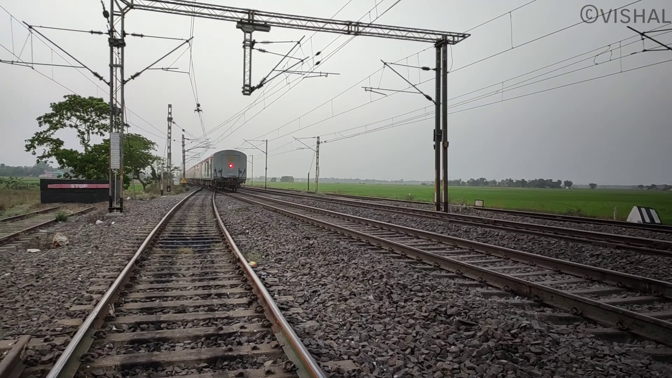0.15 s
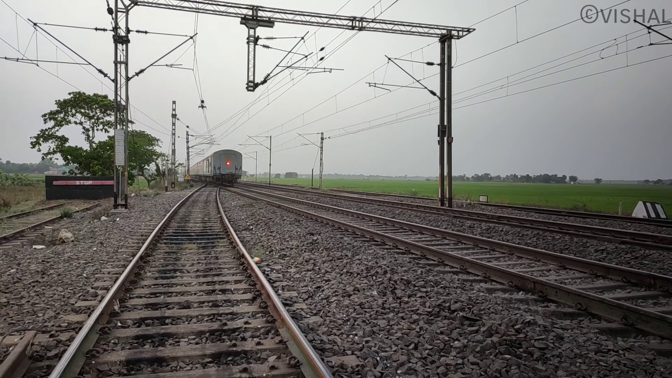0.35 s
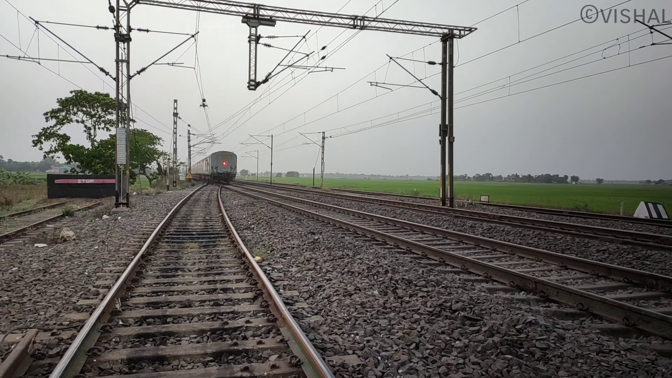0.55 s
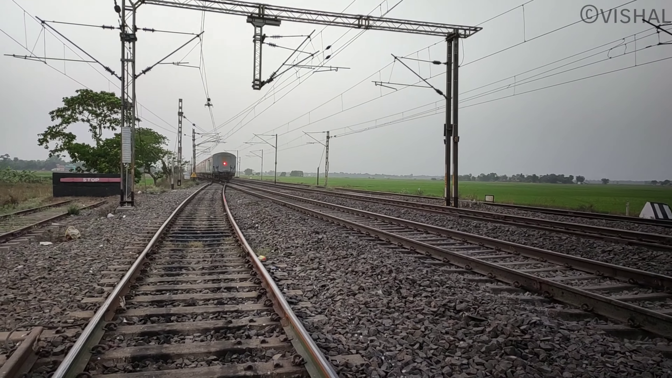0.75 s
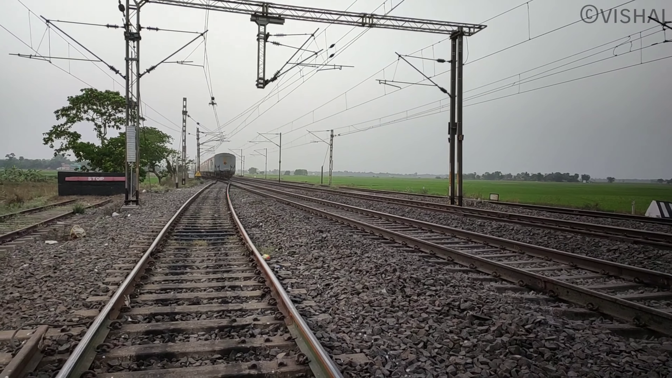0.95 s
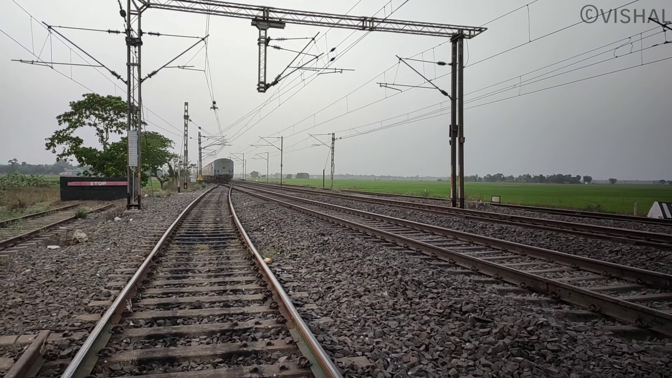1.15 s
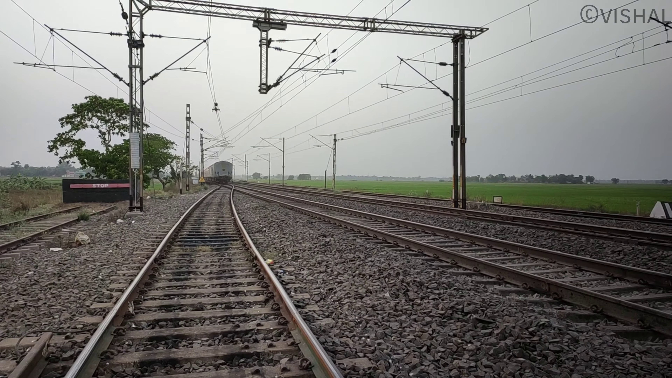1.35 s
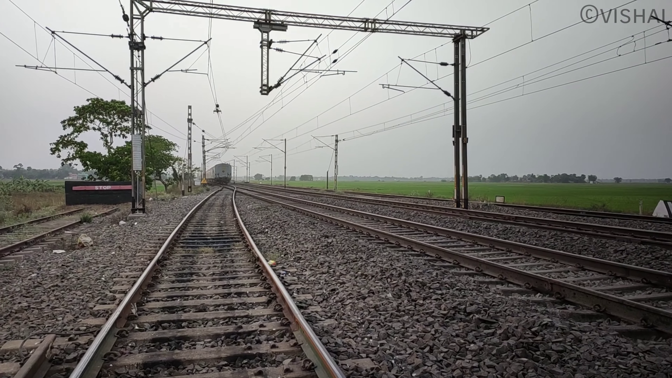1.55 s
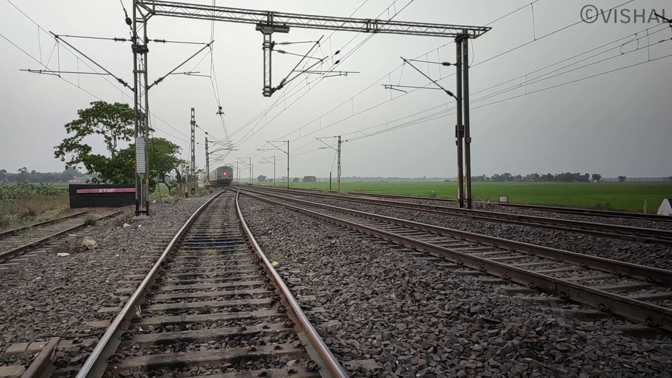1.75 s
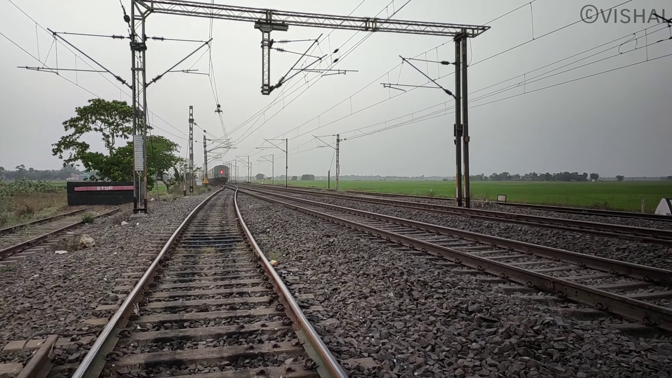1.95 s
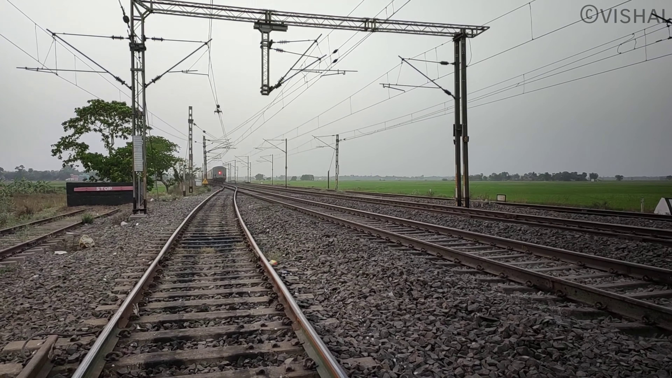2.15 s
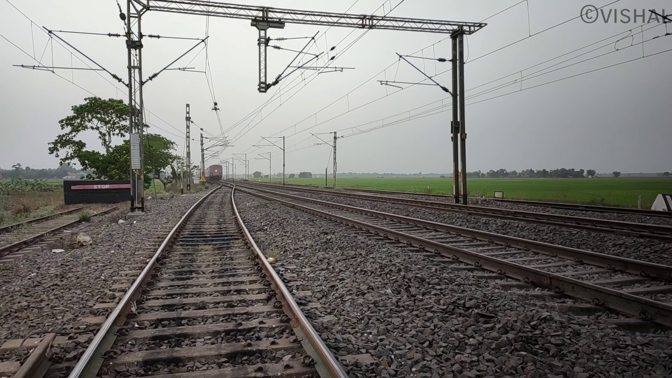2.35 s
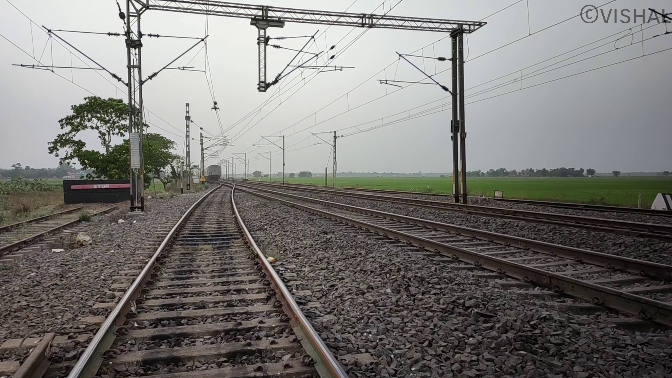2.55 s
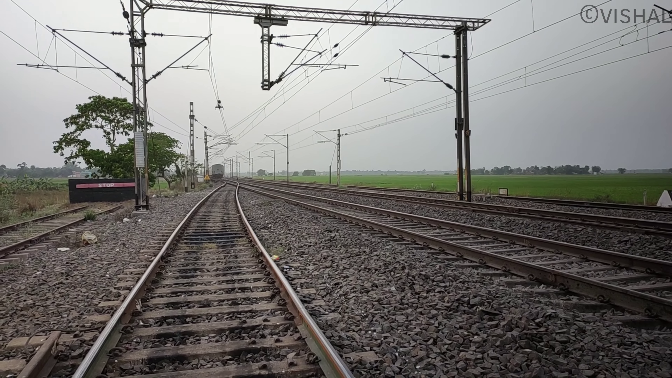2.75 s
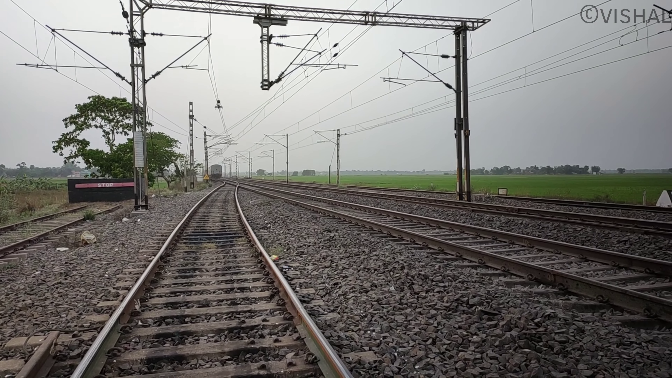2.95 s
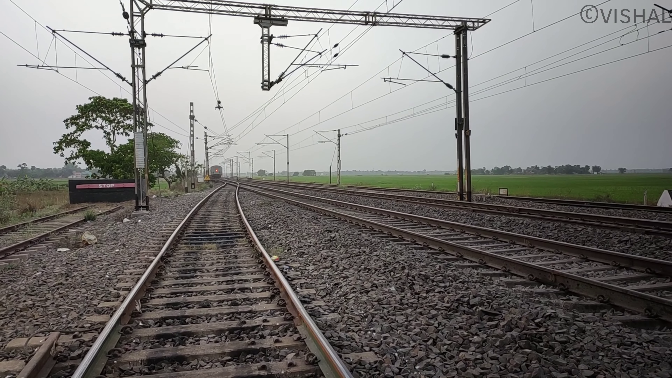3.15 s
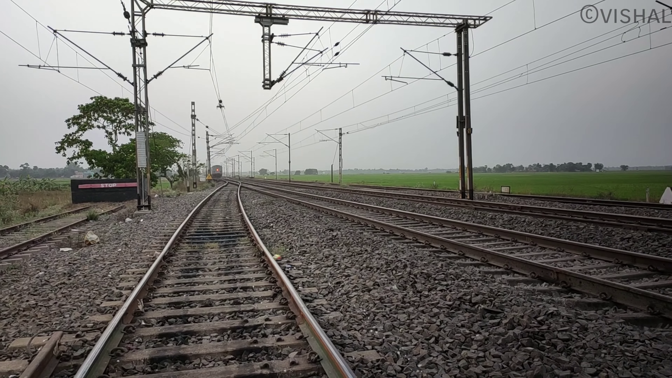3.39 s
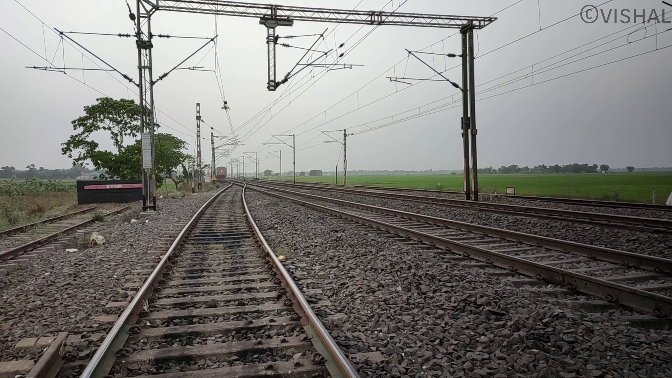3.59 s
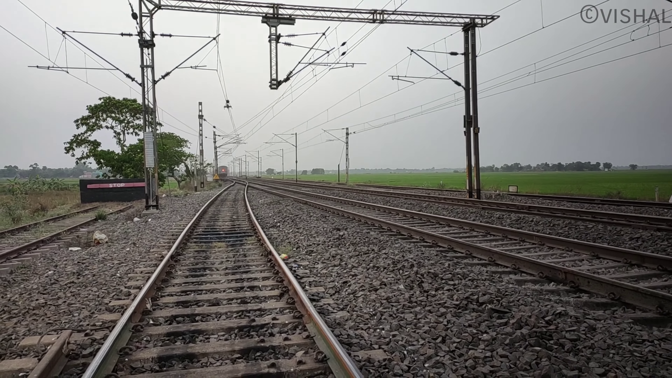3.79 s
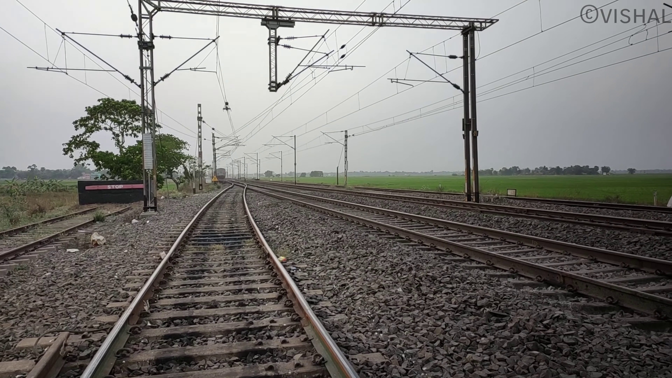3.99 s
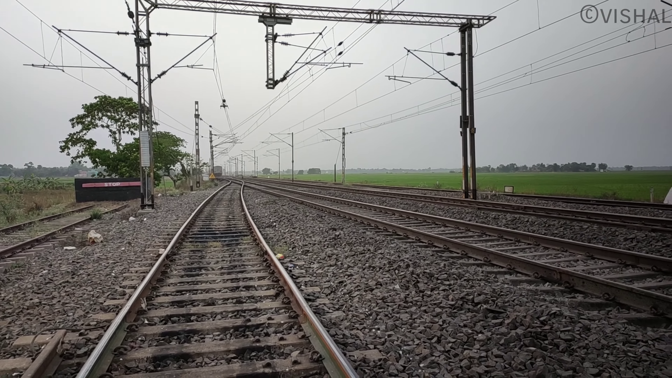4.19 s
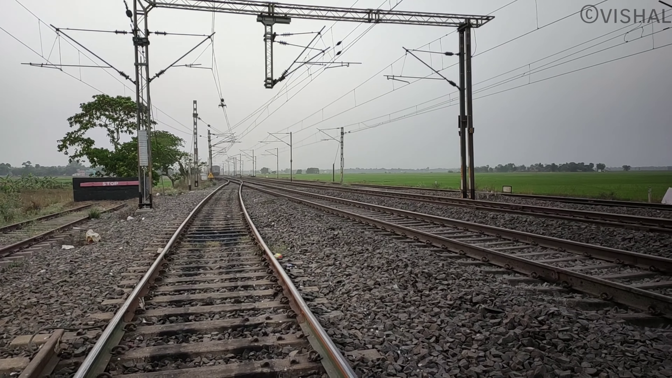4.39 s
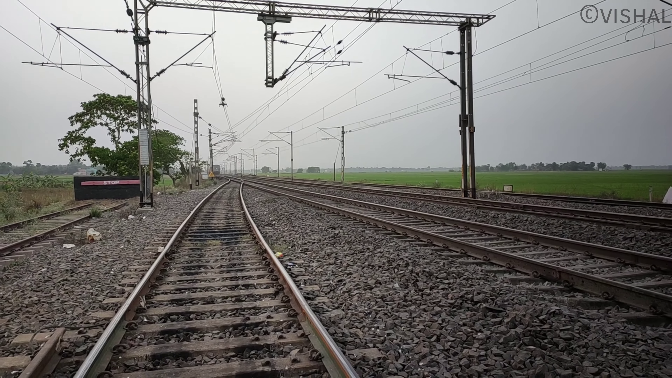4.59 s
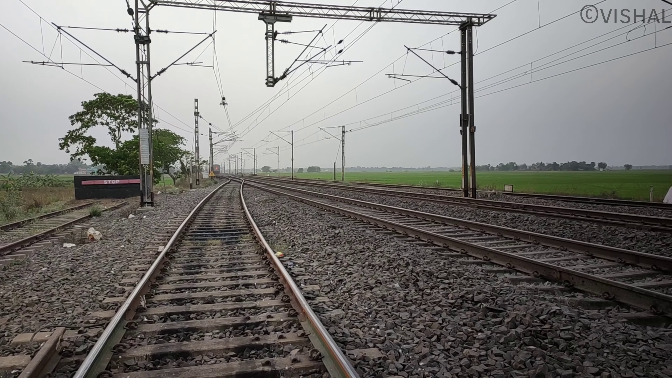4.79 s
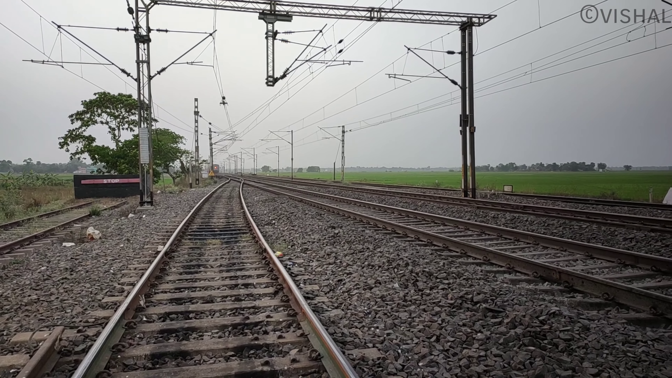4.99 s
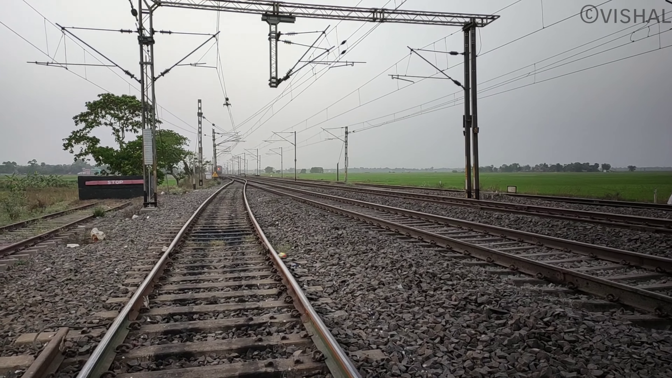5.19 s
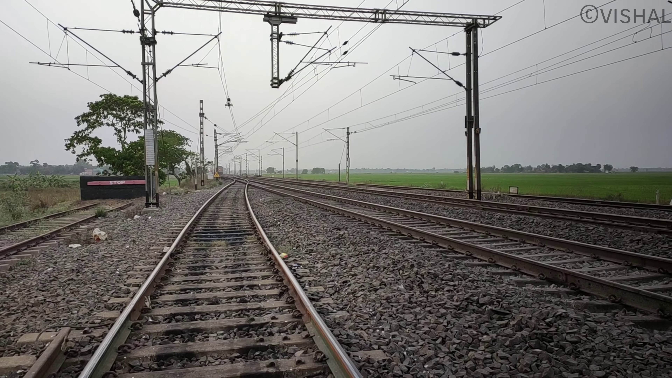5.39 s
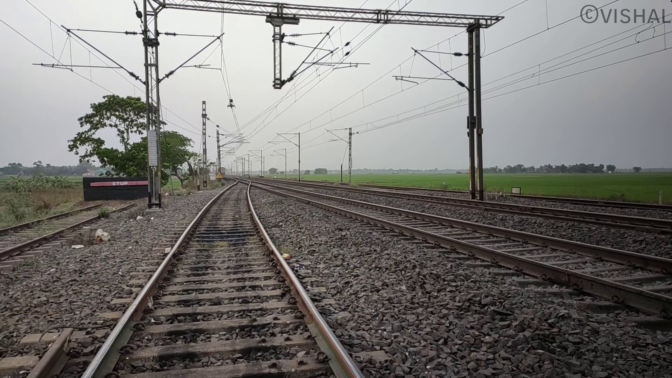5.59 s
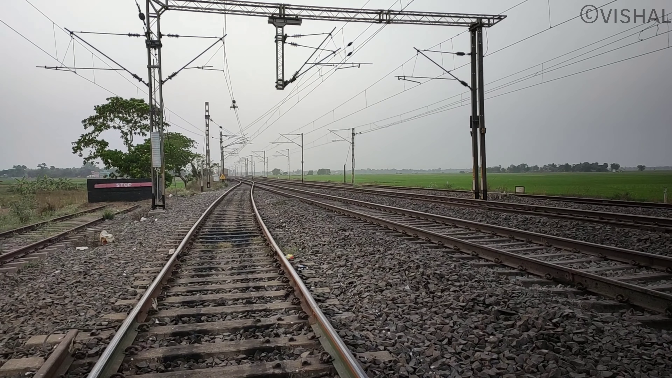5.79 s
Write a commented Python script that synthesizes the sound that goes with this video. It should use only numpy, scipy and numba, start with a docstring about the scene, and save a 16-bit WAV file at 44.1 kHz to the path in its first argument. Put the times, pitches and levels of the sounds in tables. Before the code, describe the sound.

Trackside in open fields, the tail of a fast train has just passed. A dense wheel roar with bright hiss drops away within the first second as hard slipstream gusts thump, crackle and overload the unprotected stereo microphone, strongest on the right. After about two seconds the wind breaks into separate low puffs, and a thinner, duller rolling rush with faint steely ringing recedes, slightly uneven, to the end.

```python
"""An express train has just rushed past on the next track and runs off across open fields.
Its wheels roar and the rails ring: shaped noise that spreads and loses treble with distance.
The last coach adds a fading roar and hiss, and now and then a wheel swishes on the rail.
The slipstream buffets two microphone ports as turbulent pressure noise, with gusts and
sharp eddies, at first so hard that they overload."""
import sys
import numpy as np
from scipy import signal
from scipy.fft import rfft, irfft
from scipy.io import wavfile
from scipy.ndimage import uniform_filter1d
from numba import njit

SR = 44100
rng = np.random.default_rng(int(sys.argv[2]) if len(sys.argv) > 2 else 0)


def unload_audio(sound):
    """Save the sound as a 16-bit wav file, at the path given as the first command line argument."""
    columns = np.transpose(np.atleast_2d(sound))
    # keep every value between -1 and 1, then stretch to whole-number steps
    steps = np.round(np.clip(columns, -1, 1) * 32767)
    wavfile.write(sys.argv[1], SR, steps.astype(np.int16))


N = 257544
TIME = np.arange(N) / SR
FRAME = 2048   # samples per short-time spectrum


def from_db(db):
    """Decibel law: 20 dB is a tenfold amplitude gain."""
    return 10 ** (np.asarray(db) / 20)


def rms_one(x):
    """Power normalisation: scale to unit mean square."""
    return x / np.sqrt(np.mean(x ** 2) + 1e-20)


def in_time(rows, at):
    """Linear interpolation: the columns of a curve table at the given times."""
    s, *columns = np.transpose(rows)
    return [np.interp(at, s, column) for column in columns]


def at_hz(points, hz):
    """Logarithmic pitch scale: a spectrum table interpolated along log frequency."""
    f, value = np.transpose(points)
    return np.interp(np.log(hz + 1), np.log(f), value)


def drift(rate_hz):
    """Low-passed noise: smooth chance of spread 1, changing about rate_hz times a second."""
    hz = np.fft.rfftfreq(N, 1 / SR)
    spectrum = rfft(rng.standard_normal(N)) / (1 + (hz / rate_hz) ** 2)
    return rms_one(irfft(spectrum, N))


def butter(x, hz, kind, order=2):
    """Butterworth filtering: a maximally flat passband."""
    return signal.sosfilt(signal.butter(order, hz, kind, fs=SR, output="sos"), x)


def swell(s, length, at):
    """Gaussian envelope: height 1 at time s, falling to 1/e one length away."""
    return np.exp(-((at - s) / length) ** 2)


def around(s):
    """Local time window: sample numbers of the 0.4 s around a moment, held at the ends."""
    return np.clip(round(s * SR) + np.arange(-SR // 5, SR // 5), 0, N - 1)


def noise_frames(channels):
    """Short-time Fourier analysis of white noise: frequencies, times, frames."""
    return signal.stft(rng.standard_normal((channels, N)), SR, nperseg=FRAME)


def peaks_db(rows, hz):
    """Resonance curves: the summed lift in dB of rows (frequency, width, peak dB)."""
    return sum(db / (1 + (2 * (hz - f) / width) ** 2) for f, width, db in rows)


def port_turn(hz, turn_hz, half_width_hz, radians):
    """Phase dispersion: the lag between the ports makes a smooth step around one frequency."""
    return radians * (.5 + np.arctan((hz - turn_hz) / half_width_hz) / np.pi)


def strands(shape):
    """Random excitation: narrow bands swell and fade as the wheels meet fresh rail; spread 1."""
    over_hz = uniform_filter1d(rng.standard_normal(shape), size=2, axis=0)
    return rms_one(uniform_filter1d(over_hz, size=8, axis=1))


# directivity of the ports, which face different ways: (frequency [Hz], left minus right [dB])
PORT_BALANCE = [(200, -0.5), (450, 0), (630, -5), (800, 5), (1150, 8), (1400, 4.5), (1850, 4), (2120, 10),
                (2500, -2.5), (2800, -3), (3350, 2), (4700, -4.5), (5300, 3), (7200, -3), (11000, 0.5)]
# air resonances in the right port: (frequency [Hz], width [Hz], peak lift [dB])
RIGHT_PORT_RESONANCES = [(2450, 700, 5.5), (4144, 380, 8), (7270, 1000, 2.5)]


def port_colour_db(hz):
    """Directivity and cavity resonance: the (left, right) colour in dB of each port."""
    half = at_hz(PORT_BALANCE, hz) / 2
    return np.array([half, peaks_db(RIGHT_PORT_RESONANCES, hz) - half])


def at_ports(frames, hz):
    """Inverse Fourier synthesis: frames back to sound, coloured by each port."""
    coloured = frames * from_db(port_colour_db(hz))[:, :, None]
    return signal.istft(coloured, SR)[1][:, :N]


START_M, SPEED_M_S = 11.1, 35.7


def distance_m(at):
    """Uniform motion: the train draws away at a steady speed."""
    return START_M + SPEED_M_S * at


# a long line of sources spreads slowly: level at the start, loss per doubling of distance
ROLLING_DB, SPREAD_DB = -21, 3.5
# the last coach's hiss fades fast; a faint hiss stays at a level relative to the rolling
NEAR_HISS_DB, HISS_FADE_DB_PER_S, FAR_HISS_DB = -29, 9.5, -22
# rougher and smoother stretches of rail:
# (time [s], 1/e half length [s], rolling lift [dB], hiss lift [dB])
RAIL_ROUGHNESS = [(0.435, .04, -2, 1), (1.694, 0.022, 1.5, 6), (2.007, 0.15, 2, 4.5), (2.465, 0.091, 2, 6),
                  (2.784, 0.13, 2, 8), (3.152, 0.14, 4, 9.5), (3.648, 0.35, 4, 4), (4.226, 0.13, 6.5, 4.5),
                  (4.58, 0.14, 4, 3.5), (4.843, 0.024, -2, -1), (4.948, 0.051, 4, 4), (5.023, 0.037, 3, 3),
                  (5.213, 0.11, 2, 4), (5.31, 0.067, -2, 0), (5.392, 0.025, 3, 2), (5.45, 0.025, 6, 2),
                  (5.534, 0.017, -6, 5), (5.66, 0.05, 3, 0)]


def train_levels(at):
    """Geometric spreading: rolling and hiss in dB sink with distance and vary with the rail."""
    rolling_db = ROLLING_DB - SPREAD_DB * np.log2(distance_m(at) / START_M)
    near_hiss = from_db(NEAR_HISS_DB - HISS_FADE_DB_PER_S * at)
    far_hiss = from_db(rolling_db + FAR_HISS_DB)
    hiss_db = 20 * np.log10(np.hypot(near_hiss, far_hiss))
    for s, length, rolling_lift_db, hiss_lift_db in RAIL_ROUGHNESS:
        shape = swell(s, length, at)
        rolling_db = rolling_db + rolling_lift_db * shape
        hiss_db = hiss_db + hiss_lift_db * shape
    return rolling_db, hiss_db


RING_WANDER, RING_SWING_DB = 0.015, 2.2   # spread of pitch (as a share of it) and of strength
# ringing of wheels and rails: (frequency [Hz], width [Hz], peak lift [dB])
RINGING_MODES = [(893, 290, 5.5), (1370, 21, 4.5), (1653, 56, 8), (1906, 68, 6.5), (2124, 42, 2),
                 (2490, 12, -2), (3140, 36, 2), (3410, 160, 3.5)]


def ringing_db(hz, count):
    """Modal resonance: ringing bands waver in pitch and strength; dB by frequency and frame."""
    chance = rng.standard_normal((len(RINGING_MODES), 2, count))
    waver = rms_one(uniform_filter1d(uniform_filter1d(chance, size=7), size=5))
    modes = []
    for (f, width, db), (bend, swing) in zip(RINGING_MODES, waver):
        modes.append((f * (1 + RING_WANDER * bend), width, db + RING_SWING_DB * swing))
    return peaks_db(modes, hz[:, None])


AIR_DB_PER_M = 0.0122   # loss at 4 kHz
LEFT_LAG_S = .00007
GROUND_DIP = (310, 340, -2)   # (frequency [Hz], width [Hz], lift [dB] at GROUND_FAR_M)
GROUND_FAR_M = 187
# wheels on rails: (frequency [Hz], relative density [dB per Hz])
ROLLING_SPECTRUM = [(30, 7.5), (120, -2), (220, -4.5), (400, 4), (540, 1), (690, -8.5), (1000, -6.5),
                    (1250, -15), (1750, -5.5), (2350, -8), (3100, -13.5), (4500, -21.5), (5400, -36),
                    (15000, -52)]
# coherence of the rolling sound: (frequency [Hz], share of power common to both ports [0 to 1])
COMMON_SHARE = [(100, 1), (450, 0.97), (900, 0.62), (2000, 0.89), (4200, 0.45), (9000, 0.086)]


def rolling(rattle_db=0.92, rattle_hz=22):
    """Roughness excitation and air absorption: rough wheels drive the steel, air takes the treble."""
    hz, s, white = noise_frames(channels=3)
    spectrum_db = at_hz(ROLLING_SPECTRUM, hz)[:, None] + ringing_db(hz, count=len(s))
    colour = rms_one(from_db(spectrum_db))
    # the ground swallows the low mids with distance
    ground_db = peaks_db([GROUND_DIP], hz)[:, None] * (distance_m(s) / GROUND_FAR_M) ** 2
    air_db = -AIR_DB_PER_M * (hz[:, None] / 4000) ** 1.66 * distance_m(s)
    common = at_hz(COMMON_SHARE, hz)[:, None]
    frames = np.sqrt(common) * white[2] + np.sqrt(1 - common) * white[:2]
    # around the air resonance the two ports turn out of phase
    turn = port_turn(hz, turn_hz=2586, half_width_hz=190, radians=-5.5)
    frames[0] *= np.exp(-1j * (2 * np.pi * hz * LEFT_LAG_S + turn))[:, None]
    strands_db = 2.5 * strands(white[0].shape)
    frames = frames * colour * from_db(air_db + ground_db + strands_db)
    rolling_db, _ = train_levels(TIME)
    return from_db(rolling_db + rattle_db * drift(rattle_hz)) * at_ports(frames, hz)


ROAR_HOLD_S = 0.59   # the roar holds while the last bogie is near
ROAR_PAN_DB, ROAR_COMMON = -6, 0.87   # left minus right; share of power common to both ports
# churned air and bogies: (frequency [Hz], relative density [dB per Hz])
BOGIE_ROAR = [(60, 7.5), (230, 4), (450, 2.5), (600, 11.5), (700, -1.5), (870, 4), (1000, 1), (1220, 3),
              (1420, -34), (2250, -9.5), (2900, -21), (4000, -36), (9000, -45)]
# hiss of steel and dust: (frequency [Hz], relative density [dB per Hz])
STEEL_HISS = [(1500, -4.5), (3500, 2), (5500, -1), (7500, -1.5), (11000, 1), (13000, -2.5), (15000, -12.5)]


def last_coach(roar_db=-19.0, fade_db_per_s=35, flicker_db=1.5,
               near_top_hz=20000, far_top_hz=6300, dulling_s=0.49):
    """Broadband noise radiation: the bogie roar holds and drops away; the hiss sinks and dulls."""
    hz, s, white = noise_frames(channels=5)
    roar = np.sqrt(ROAR_COMMON) * white[4] + np.sqrt(1 - ROAR_COMMON) * white[:2]
    # the upper roar reaches the ports out of phase
    turn = port_turn(hz, turn_hz=577, half_width_hz=49, radians=-3.5)
    roar[0] *= np.exp(-1j * turn)[:, None]
    roar *= from_db([ROAR_PAN_DB / 2, -ROAR_PAN_DB / 2])[:, None, None]
    roar *= rms_one(from_db(at_hz(BOGIE_ROAR, hz)))[:, None]
    strands_db = 3.5 * strands(white[0].shape)
    roar *= from_db(roar_db + strands_db - fade_db_per_s * np.maximum(s - ROAR_HOLD_S, 0))

    _, hiss_db = train_levels(s)
    top_hz = far_top_hz + (near_top_hz - far_top_hz) * np.exp(-s / dulling_s)
    dull = 1 / np.sqrt(1 + (hz[:, None] / top_hz) ** 10)
    hiss_colour = rms_one(from_db(at_hz(STEEL_HISS, hz)))[:, None]
    hiss = white[2:4] * hiss_colour * from_db(hiss_db) * dull
    return at_ports(roar + hiss, hz) * from_db(flicker_db * drift(15))


@njit
def glide_lowpass(x, pole):
    """Cascaded first-order smoothing: three one-pole low-passes with a moving corner."""
    out = np.empty_like(x)
    a = b = c = 0.
    for i in range(len(x)):
        a += (1 - pole[i]) * (x[i] - a)
        b += (1 - pole[i]) * (a - b)
        c += (1 - pole[i]) * (b - c)
        out[i] = c
    return out


def turbulence(eddy_hz):
    """Eddy spectrum: pressure noise of about unit power, falling steeply above the eddy rate."""
    eddy_hz = np.clip(eddy_hz, 40, 9000)
    power = 3 * np.pi / 8 * eddy_hz / SR   # what the low-passes let through
    pole = np.exp(-2 * np.pi * eddy_hz / SR)
    return glide_lowpass(rng.standard_normal(len(eddy_hz)), pole) / np.sqrt(power)


# flutter grows faster than its wind: level at 0 dB of wind, and dB per dB, for (left, right)
FLUTTER_DB, FLUTTER_GROWTH = (-8, -2), (1.54, 1.158)
LEE_FLUTTER_DB = -10.5   # the port on the far side of a gust flutters less
# small eddies die out first, so past its peak the wake coarsens; eddy rates for (left, right)
FRESH_EDDY_HZ, SPENT_EDDY_HZ = (344, 1200), (295, 343)
WAKE_PEAK_S, WAKE_LIFE_S = 0.65, 0.47
# the slipstream arrives, blows hard and ebbs to a breeze:
# (time [s], wind at the left port [dB], wind at the right port [dB])
SLIPSTREAM_WIND = [(0, -17.5, -32), (.33, -14.5, -13.5), (.44, -12.5, -9), (.98, -5.5, -1.5),
                   (1.2, -9.5, -8.5), (1.39, -8.5, -16), (1.7, -12, -10), (2.1, -11.5, -11),
                   (2.2, -14, -29.5), (2.42, -21, -21), (2.8, -12, -31), (3.02, -23.5, -36),
                   (3.4, -29, -26), (3.68, -18.5, -44), (4.1, -22.5, -19), (5.05, -22, -27.5),
                   (5.4, -26.5, -43), (5.52, -34, -38), (5.84, -28, -34)]
# gusts shed by the train: (time [s], 1/e half length [s], left push [dB], right push [dB],
# flutter relative to the push [dB])
SHED_GUSTS = [(0.022, 0.099, -3, -35, -19.5), (0.164, 0.028, -46, -16.5, 3), (0.443, 0.03, -12, 3, -9),
              (0.603, 0.21, -1, -11, -34), (0.783, 0.12, 1.5, 3.5, -5), (1.064, 0.087, -13, 3, -27),
              (1.29, 0.045, -16, -10, 2), (1.58, 0.031, -16, -28, -27), (1.795, 0.064, -12.5, -13, -4),
              (2.05, 0.02, -9, -8, -15), (2.201, 0.026, -2, -41, -13), (2.331, 0.043, -31, -17.5, 3),
              (2.507, 0.061, -14, -13, -9), (2.616, 0.029, -8, -41, -19.5), (2.712, 0.032, -16, -15, 1.5),
              (2.8, 0.067, -9.5, -20, -12.5), (3.15, 0.069, -13.5, -29, -9.5),
              (3.335, 0.06, -52, -19.5, -16), (3.74, 0.033, -11.5, -40, -12.5), (3.855, 0.015, 2, -10, -22),
              (3.921, 0.11, -14, -12, -1.5), (4.035, 0.012, -8, 1.5, -14), (4.073, 0.0097, -7, -10.5, -28),
              (4.213, 0.044, -44, -12.5, -5.5), (4.4, 0.066, -21.5, -21, 0), (4.477, 0.039, -23, -6, -22),
              (4.667, 0.08, -37, -26.5, 0.5), (4.793, 0.055, -14, -8, -22), (4.912, 0.047, -37, -17, -6.5),
              (5.125, 0.013, -20.5, -19, -13), (5.752, 0.18, -44, -20, -30)]


def airflow(port):
    """Power addition of gusts and slipstream: buffeting dB, flutter dB and eddy rate at a port."""
    side = ["left", "right"].index(port)
    flow_db = in_time(SLIPSTREAM_WIND, TIME)[side]
    push = from_db(flow_db)
    flutter = from_db(FLUTTER_DB[side] + FLUTTER_GROWTH[side] * flow_db)
    for s, length, left_db, right_db, flutter_db in SHED_GUSTS:
        gust_db = (left_db, right_db)[side]
        gust = from_db(gust_db) * swell(s, length, TIME)
        lee_db = LEE_FLUTTER_DB if gust_db < max(left_db, right_db) else 0
        push = np.hypot(push, gust)
        flutter = np.hypot(flutter, gust * from_db(flutter_db + lee_db))
    freshness = 1 / (1 + ((TIME - WAKE_PEAK_S) / WAKE_LIFE_S) ** 2)
    eddy_hz = SPENT_EDDY_HZ[side] + (FRESH_EDDY_HZ[side] - SPENT_EDDY_HZ[side]) * freshness
    return 20 * np.log10(push), 20 * np.log10(flutter), eddy_hz


def wind(port, knee_hz, top_hz, lowest_hz, flutter_low_hz, lumpy_db, lump_hz, quicken,
         grain_db=1.33, grain_hz=260):
    """Turbulent pressure: big eddies push slowly, small ones flutter; both brighten with strength."""
    buffet_db, flutter_db, eddy_hz = airflow(port)
    # top_hz is the eddy rate at 0 dB of buffeting
    buffet = turbulence(top_hz * from_db(quicken * buffet_db))
    buffet = butter(butter(buffet, knee_hz, "low", order=1), lowest_hz, "high")
    # the airflow alone sets the strength
    buffet /= np.sqrt(uniform_filter1d(buffet ** 2, size=SR // 10) + 1e-9)
    # each burst breaks up into finer grains
    lumps_db = lumpy_db * np.clip(drift(lump_hz), -2, 2)
    grains_db = grain_db * np.clip(drift(grain_hz), -2, 2)
    burst_db = lumps_db + grains_db
    flutter = turbulence(eddy_hz * from_db(quicken * burst_db))
    flutter = butter(flutter, flutter_low_hz, "high", order=1) * from_db(burst_db)
    # bursts share out the flutter's power
    flutter /= np.sqrt(uniform_filter1d(flutter ** 2, size=SR // 12) + 1e-9)
    return from_db(buffet_db) * buffet + from_db(flutter_db) * flutter


# small sharp eddies that strike the ports, levels before the ports dull them:
# (time [s], left level [dB], right level [dB], length [s], eddy rate [Hz])
SHARP_EDDIES = [(0.023, -16, -36, 0.008, 507), (.389, -20, -12, .004, 1000), (0.414, -14, -3, 0.02, 1400),
                (0.439, -21, -6.5, 0.01, 2000), (0.461, -28, -8, 0.0044, 2300),
                (0.492, -21, -4, 0.015, 990), (0.536, -29, -1, 0.019, 1490), (0.605, -34, -1, .001, 3800),
                (0.608, -36, -0.5, 0.0081, 2300), (0.626, -34, -9, 0.0088, 1900),
                (0.678, -25, -14, 0.0026, 1500), (0.69, -24, 1, 0.01, 2000), (0.707, -30, -3, 0.016, 3330),
                (0.711, -22, 3, 0.0014, 4500), (0.728, -30, 4.5, 0.0061, 3200),
                (.738, -28, -5, 0.0013, 3800), (0.758, -28, -1.5, 0.0061, 2000),
                (0.792, -25, -4, 0.0086, 3000), (0.793, -21, -7, 0.0019, 3000),
                (0.808, -31, 10.5, 0.0029, 6800), (0.813, -30, -10, 0.0015, 3500),
                (.838, -30, -4, 0.026, 1700), (0.92, -31, 2.5, 0.0076, 1840), (0.935, -37, 2, 0.036, 1560),
                (0.971, -28, -2.5, 0.0036, 2500), (0.991, -35, -1, 0.016, 1990),
                (1.012, -30, 7, 0.0014, 5070), (1.02, -30, -4, 0.0037, 3200),
                (1.029, -2.5, 2.5, 0.011, 610), (1.049, -32, -1.5, 0.03, 1770),
                (1.076, -34, 2, 0.0013, 2600), (1.08, -34, -2, 0.0012, 2600),
                (1.112, -30, -7.5, 0.032, 1210), (1.293, -30, -6.5, 0.034, 1520),
                (1.546, -22, -35, 0.017, 400), (1.574, -34, -20, 0.0025, 700),
                (1.666, -14, -20, 0.011, 400), (1.703, -23, -9, 0.013, 900), (1.746, -26, -7.5, 0.004, 750),
                (1.776, -15, -33, .004, 1400), (1.804, -28, -1.5, 0.00098, 1550),
                (1.818, -31, -9, 0.016, 1190), (1.878, -40, -10, 0.013, 1160),
                (1.964, -37, -15.5, .008, 800), (2.053, -48, -11.5, 0.016, 1200),
                (2.323, -39, -19.5, 0.012, 975), (2.624, -20, -42, 0.0062, 400),
                (3.849, -19, -10, 0.011, 555), (3.866, -22, -12, 0.0055, 606),
                (3.892, -27, -17, 0.0045, 750), (3.909, -28, -7.5, 0.012, 180),
                (3.916, -23, -12.5, 0.011, 750), (3.919, -40, -20, .001, 3500),
                (3.96, -29, -7, 0.0032, 890), (3.971, -39, -12, 0.011, 1000),
                (4.036, -28, -12, 0.0042, 553), (4.04, -34, -11, 0.014, 172),
                (4.462, -28, -11.5, 0.007, 240), (4.628, -36, -17.5, 0.017, 327),
                (4.803, -28, -20.5, 0.011, 220), (4.878, -38, -15.5, 0.01, 300),
                (5.126, -30, -22, 0.0077, 350), (5.757, -42, -25, 0.011, 200)]


def rips(low_hz=170, grain_db=2.0):
    """Vortex impact: each eddy's burst rises faster than it dies and crackles as it breaks up."""
    out = np.zeros((2, N))
    for s, left_db, right_db, length, eddy_hz in SHARP_EDDIES:
        near = around(s)
        age = (TIME[near] - s) / length
        bell = np.exp(-np.where(age < 0, 3, 1.6) * age ** 2)
        for port, level_db in enumerate([left_db, right_db]):
            noise = turbulence(np.full(len(near), float(eddy_hz)))
            burst = bell * butter(noise, low_hz, "high", order=1)
            crackle = rms_one(butter(rng.standard_normal(len(near)), 400, "low"))
            burst *= from_db(grain_db * crackle)
            to_bell_energy = np.sqrt(np.sum(bell ** 2) / np.sum(burst ** 2))
            out[port, near] += from_db(level_db) * burst * to_bell_energy
    return out


# brief sings and swishes of the wheels, levels before the port colour:
# (time [s], level [dB], 1/e half length [s], centre [Hz], width [Hz])
WHEEL_SWISHES = [(0.052, -30, 0.025, 2270, 650), (0.087, -29, .03, 1000, 300),
                 (0.172, -32, 0.027, 990, 300), (0.181, -28, .018, 2330, 500),
                 (0.231, -31.5, 0.043, 2250, 500), (.375, -16.5, 0.034, 566, 168),
                 (3.549, -39.5, 0.19, 1680, 350), (3.679, -36.5, .07, 553, 260),
                 (4.198, -33, .06, 764, 480), (4.224, -30, 0.022, 1750, 600), (4.402, -33.5, .04, 556, 220),
                 (4.555, -46, 0.017, 2880, 1400), (4.692, -35.5, 0.033, 565, 180),
                 (4.941, -32.5, 0.01, 870, 129), (5.016, -35, 0.016, 850, 150),
                 (5.033, -29, 0.0079, 460, 160), (5.218, -36, .018, 624, 160),
                 (5.385, -38.5, .015, 890, 140), (5.458, -37.5, 0.021, 875, 130),
                 (5.462, -32.5, 0.016, 1710, 320), (5.657, -42.5, 0.037, 2960, 1000),
                 (5.723, -48.5, 0.043, 2800, 1200)]


def swishes():
    """Frictional excitation: now and then a wheel rubs the rail and one band swells."""
    out = np.zeros((2, N))
    for s, level_db, length, hz, width in WHEEL_SWISHES:
        near = around(s)
        white = rng.standard_normal((3, len(near)))
        band = rms_one(butter(white, [hz - width / 2, hz + width / 2], "band"))
        pair = (band[:2] + band[2]) / np.sqrt(2)   # half the power is common to both ports
        gain = from_db(level_db + port_colour_db(hz))[:, None]
        out[:, near] += gain * swell(s, length, TIME[near]) * pair
    return out


SELF_NOISE_DB = -80


def scene():
    """Superposition: train, wind and self-noise add; each port has its own wind."""
    train = rolling() + last_coach()
    left = wind("left", knee_hz=24.9, top_hz=364.0, lowest_hz=10, flutter_low_hz=91.5,
                lumpy_db=3.5, lump_hz=34.5, quicken=0.35)
    right = wind("right", knee_hz=37.0, top_hz=406.0, lowest_hz=12.3, flutter_low_hz=102,
                 lumpy_db=2.5, lump_hz=54.6, quicken=0.33)
    # the narrow ports dull the wind
    gusts = butter(np.array([left, right]) + rips(), 1840, "low", order=1)
    self_noise = from_db(SELF_NOISE_DB) * rng.standard_normal((2, N))
    return train + gusts + swishes() + self_noise


CUTOFF_HZ = 15600


def record(dry):
    """Saturation and band-limiting: peaks flatten with rounded tops; the highest treble is cut."""
    hardness = 60
    clipped = dry / (1 + abs(dry) ** hardness) ** (1 / hardness)
    return signal.sosfilt(signal.ellip(10, .1, 70, CUTOFF_HZ, fs=SR, output="sos"), clipped)


dry = scene()
out = record(dry)
unload_audio(out)
```